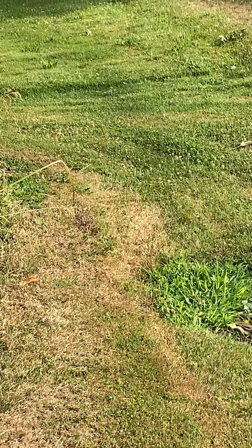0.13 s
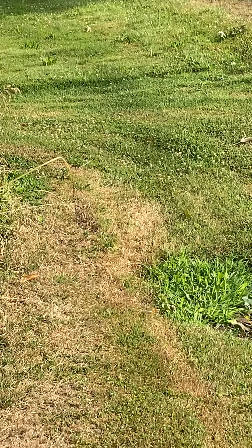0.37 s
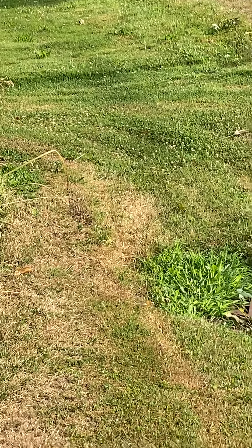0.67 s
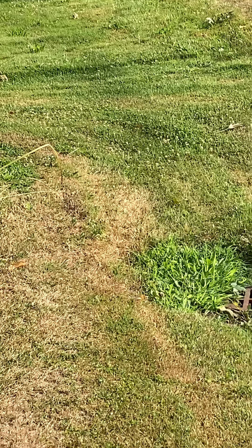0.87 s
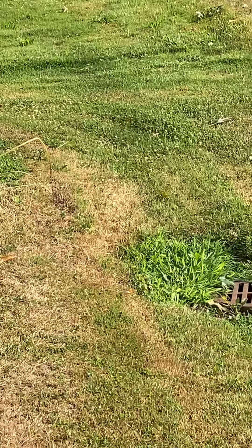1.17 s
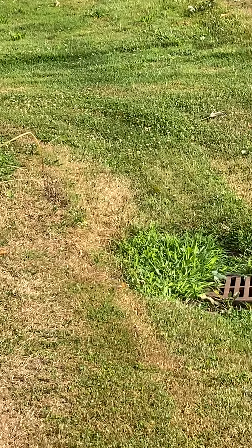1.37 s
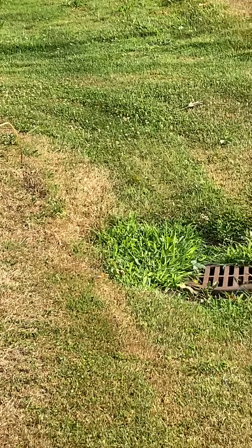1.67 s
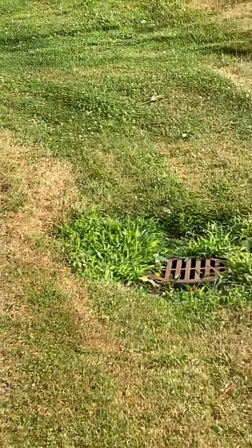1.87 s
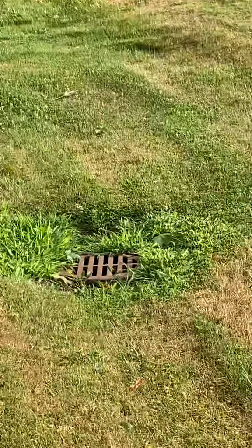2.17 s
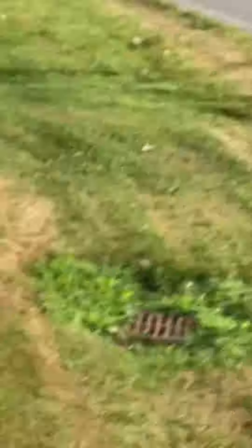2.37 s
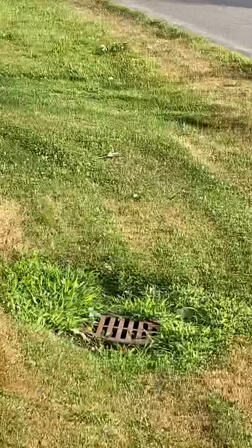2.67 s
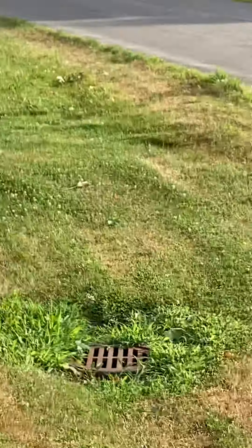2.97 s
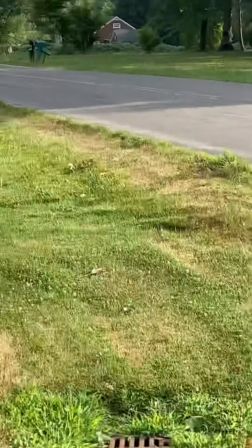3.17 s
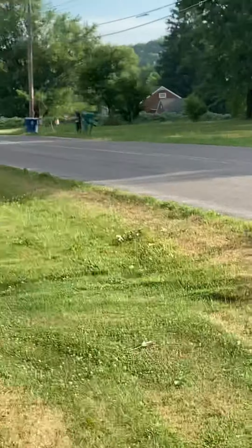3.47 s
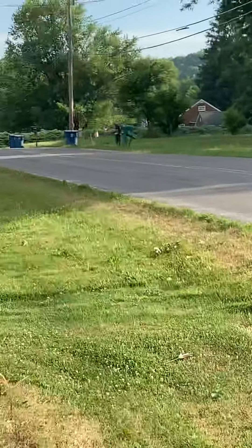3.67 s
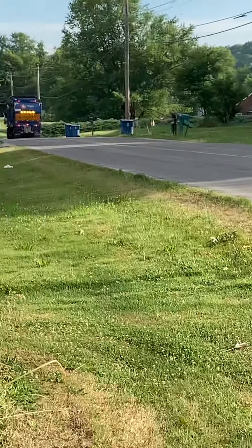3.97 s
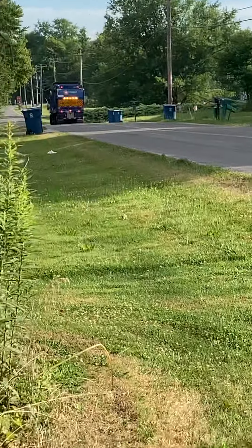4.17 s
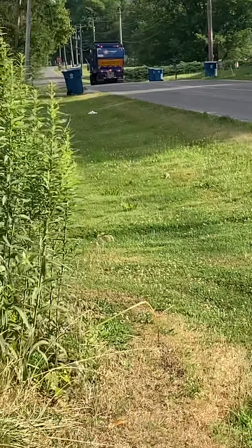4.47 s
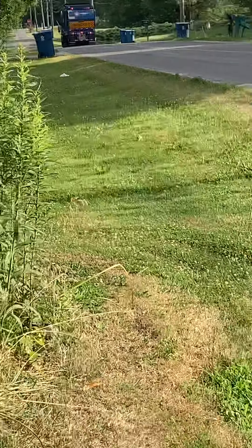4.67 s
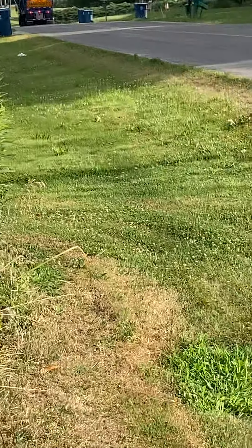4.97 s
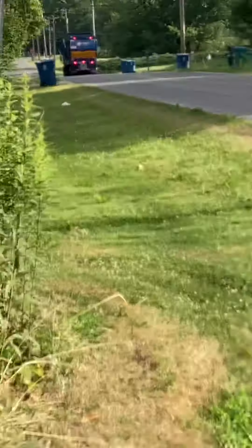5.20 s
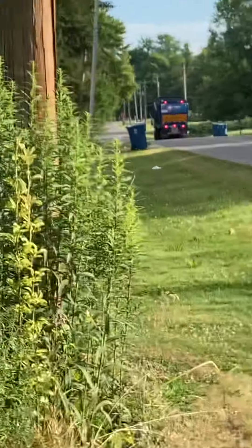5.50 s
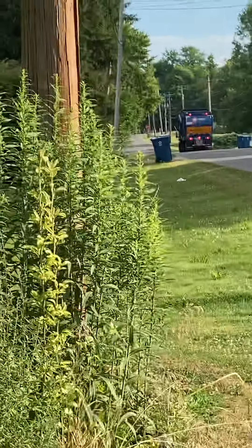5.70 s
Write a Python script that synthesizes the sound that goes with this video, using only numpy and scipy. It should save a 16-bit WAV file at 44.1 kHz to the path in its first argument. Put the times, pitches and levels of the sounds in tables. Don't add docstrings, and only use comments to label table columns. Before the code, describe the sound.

A distant diesel refuse truck hums low and steady while its brakes squeal thin and high, metal knocks, and a small bird twitters briefly.

```python
import sys
import numpy as np
from scipy import signal
from scipy.fft import rfft, irfft, next_fast_len
from scipy.io import wavfile

SR = 44100
rng = np.random.default_rng(int(sys.argv[2]) if len(sys.argv) > 2 else 0)


def generate_wav(signal):
    frames = np.transpose(np.atleast_2d(signal))
    scaled = np.clip(frames, -1, 1) * 32767
    pcm = np.round(scaled).astype(np.int16)
    wavfile.write(sys.argv[1], SR, pcm)


def voltage_ratio(decibels):
    exponent = np.asarray(decibels, float) / 20
    return 10 ** exponent


N = 257539

# [t/s, f/Hz]
FIRING_RATE = [
    (0, 78.24),
    (1.45, 79.1),
    (1.9, 77.48),
    (5.84, 76.94),
]
# [t/s, firing tone level/dB, octave level/dB]
EXHAUST_LEVELS = [(0, -41.5, -56), (.62, -40, -52), (.78, -36, -56.5), (.92, -38, -53.5), (1.4, -36, -52.5),
                  (1.8, -37, -49), (2.05, -41, -56.5), (2.5, -44, -60), (2.95, -58.5, -57),
                  (3.15, -42.5, -49), (3.8, -49, -54), (3.95, -36, -62), (4.2, -35, -50),
                  (4.32, -42, -58.5), (4.45, -34.5, -46), (4.85, -30.5, -44), (5.65, -36, -60),
                  (5.84, -40.5, -54.5)]
# [t/s, rumble level/dB, clatter level/dB]
ROAR_LEVELS = [
    (0.0, -48, -53),
    (1.15, -49, -53.5),
    (1.48, -51.5, -53.5),
    (5.84, -51, -53),
]
# [f/Hz, level per Hz/dB]
RUMBLE_COLOUR = [(15, -51.5), (25, -10.5), (40, -3), (62, 3.5), (100, 1), (140, -5.5), (200, -11),
                 (300, -21), (420, -38)]
# [f/Hz, level per Hz/dB]
CLATTER_COLOUR = [(150, -26), (260, -2), (390, -10.5), (450, -4), (690, -10.5), (1200, -5), (1700, -8.5),
                  (2890, -21), (4500, -29), (6000, -34), (9000, -49), (14000, -47.5), (15000, -76.5)]
# [f/Hz, share kept when quiet, share kept while the brakes sing]
TREBLE_KEPT = [(4900, 1, 1), (5250, .7, .3), (6500, .8, .25), (6900, 1, .75), (9400, 1, .75),
               (10000, .9, 0), (11000, .8, 0), (11400, .1, 0), (12800, .2, 0), (13200, .8, 0)]
# [t/s, length/s, f/Hz, peak level/dB]
LOW_MODES = [(.64, .21, 6060, -59), (1.06, 0.16, 6100, -65.5), (1.75, .2, 5930, -59.5),
             (1.9, 0.2, 5750, -62.5), (2.3, 0.16, 5770, -58.5), (2.33, 0.22, 5100, -48),
             (2.5, 0.38, 5060, -67.5), (2.49, 0.29, 5960, -59.5), (2.76, 0.16, 5775, -62),
             (2.82, 0.23, 5050, -63), (2.84, 0.17, 6027, -66), (3.2, 0.35, 5680, -69),
             (3.21, 0.29, 5020, -65), (3.24, 0.38, 4750, -70), (3.48, .3, 5813, -63),
             (3.65, .09, 4790, -62), (3.72, 0.26, 6130, -72.5), (3.73, 0.21, 5070, -52.5),
             (4.0, 0.46, 5790, -64.5), (3.93, .27, 4940, -62), (4.3, 0.27, 5070, -62),
             (4.46, 0.24, 4875, -56), (4.64, 0.13, 5020, -57), (4.63, .45, 4900, -67),
             (3.92, 0.43, 4150, -76), (4.55, .35, 5780, -75), (1.2, .05, 5200, -67), (1.4, .04, 5350, -66)]
# [t/s, length/s, f/Hz, peak level/dB]
MID_MODES = [(.44, 0.21, 7085, -73), (.46, 0.31, 6780, -64), (.68, 0.4, 6550, -72),
             (.78, 0.25, 7200, -67.5), (.92, 0.29, 6770, -58), (1.3, .35, 6780, -64),
             (1.5, 0.61, 7020, -55.5), (2.09, .27, 6840, -57.5), (2.27, 0.235, 7118, -64),
             (2.52, 0.32, 7090, -62), (2.95, 0.29, 7330, -58.5), (.52, 0.24, 7580, -60),
             (1.0, 0.35, 7570, -62.5), (1.79, 0.41, 7706, -58), (2.15, 0.41, 7540, -62.5),
             (2.82, 0.26, 7800, -57.5), (3.21, 0.34, 7850, -63), (3.96, 0.17, 7430, -72),
             (4.19, .3, 8010, -68), (.55, .12, 8140, -76), (.92, 0.41, 8340, -62.5), (1.55, .28, 8530, -62),
             (1.72, 0.46, 8080, -64.5), (1.86, .15, 8484, -64), (2.93, 0.16, 8465, -61),
             (3.49, 0.34, 8400, -70), (3.89, .21, 8466, -71), (4.24, 0.22, 8495, -74),
             (4.05, 0.18, 6950, -75), (4.6, 0.42, 7850, -83)]
# [t/s, length/s, f/Hz, peak level/dB]
HIGH_MODES = [(0.505, 0.13, 8871, -74.5), (.62, .58, 8610, -60), (.8, .22, 8770, -61),
              (1.251, .36, 8700, -61.5), (1.998, 0.51, 8740, -64), (2.299, .72, 8720, -58.5),
              (3.107, 0.34, 8725, -67), (4.15, 0.53, 8830, -69), (1.101, 0.34, 9240, -61),
              (1.379, 0.62, 9450, -63.5), (1.869, 0.32, 9480, -56), (2.09, 0.3, 9200, -65.5),
              (2.413, 0.36, 9530, -62.5), (2.757, 0.38, 9130, -63), (2.981, .78, 9200, -55),
              (3.149, .8, 9430, -59), (3.659, 0.67, 9210, -58), (3.784, 0.54, 9690, -65),
              (3.859, 0.73, 9520, -64), (4.169, 0.61, 9330, -58.5), (4.62, 0.33, 9560, -73),
              (1.5, 0.37, 9160, -63), (.55, 0.22, 9340, -84),
              (.74, .14, 9960, -69), (.89, .28, 10130, -72), (.63, .16, 10735, -74), (1.36, .32, 10420, -61),
             (1.63, .34, 10380, -62), (1.9, .3, 10310, -65), (2.2, .36, 10150, -63),
             (2.52, .36, 10400, -66), (2.84, .3, 10025, -61), (3.11, .55, 10085, -63),
             (3.6, .26, 10135, -69), (3.1, .33, 10620, -73), (4.17, .36, 10000, -72),
             (4.38, .27, 10970, -70), (3.0, .1, 11450, -73), (3.55, .17, 11275, -72),
             (.48, .38, 12170, -74), (2.07, .17, 12290, -75), (2.48, .3, 12250, -75), (.3, .2, 14300, -81),
             (.47, .38, 14600, -88)]
# [t/s, level/dB]
RUB_LEVELS = [
    (.35, -110),
    (.6, -80),
    (1.5, -63.5),
    (3, -62.5),
    (4.2, -88),
    (4.8, -79),
    (5.0, -110),
]
# [t/s, length/s, f/Hz, peak level/dB]
GEAR_WHINES = [(1.25, .87, 420, -55), (3.45, .75, 447, -64), (4.55, .65, 446, -62), (5.25, .5, 446, -59),
               (1.5, .4, 1331, -61), (2.4, .6, 1331, -60), (1.75, .75, 245, -59), (3.0, .2, 128, -52),
               (4.55, .65, 229, -59), (1.45, .35, 1770, -65), (3.45, .35, 252, -60)]
# [t/s, peak level/dB, ring f/Hz, t60/s]
METAL_KNOCKS = [(2.226, -54, 2000, .004), (2.226, -37.5, 3500, 0.0058), (2.225, -32, 5330, 0.0056),
                (2.262, -40, 3500, 0.0068), (2.931, -56, 3010, 0.63), (2.962, -52.5, 2920, .08),
                (4.642, -55.5, 3110, 0.18), (5.416, -44, 2970, 0.033), (5.43, -49, 3030, 0.067),
                (5.447, -51, 3000, 0.055), (5.463, -42.5, 3060, 0.049), (5.489, -48.5, 3150, 0.057)]
# [t after phrase start/s, length/s, start f/Hz, end f/Hz, level/dB]
BIRD_PHRASE = [
    (0, 0.013, 4520, 4050, -60.5),
    (0.022, 0.014, 4900, 5040, -54),
    (0.09, .024, 3800, 3640, -57),
    (.11, .017, 3400, 2700, -59),
]
# [t/s, level/dB]
PHRASE_TIMES = [
    (3.047, -0.5),
    (3.203, -0.5),
    (3.363, 0.5),
    (3.519, 0.5),
]
# [t/s, length/s, start f/Hz, end f/Hz, level/dB]
LONE_BIRD_NOTES = [
    (3.087, 0.024, 4260, 3650, -61),
    (3.732, .019, 5000, 3300, -57),
    (3.836, 0.019, 4800, 3380, -58),
    (3.88, 0.02, 3500, 2700, -61),
]
# [f/Hz, left-right likeness]
MIC_LIKENESS = [(60, 0.98), (200, 1), (500, 0.68), (1000, 0.79), (2000, 0.67), (4000, 0.11), (8000, 0.74)]
# [f/Hz, left over right level/dB]
MIC_LEFT_LEVEL = [(60, 0), (110, 3), (190, 0), (340, 3), (600, 2.5), (1060, -0.5), (1870, -2.5), (3330, -2),
                  (5910, 0), (10500, 1)]
# [f/Hz, left lead/rad]
MIC_LEFT_LEAD = [(0, .1), (340, -.18), (760, -.95), (1050, -.5), (2500, -.42), (3400, -1.9), (4000, -5.5),
                 (4700, -4.0), (5150, -3.8), (5900, -2.5), (7300, -1.2), (8450, 0), (11500, 3),
                 (12200, 3.4), (14300, 6)]


def rms_one(x):
    return x / np.sqrt(np.mean(np.abs(x) ** 2) + 1e-20)


def in_time(rows):
    s, *columns = np.transpose(rows)
    return [np.interp(np.arange(N) / SR, s, column) for column in columns]


def at_hz(points, hz):
    table = np.array(points)
    return np.interp(np.log(hz + 1), np.log(table[:, 0] + 1), table[:, 1])


def drift(rate_hz, size=N):
    r = np.exp(-2 * np.pi * rate_hz / SR)
    run_in = SR // 4
    white = rng.standard_normal(size + run_in)
    return rms_one(signal.lfilter([1], [1, -2 * r, r * r], white)[run_in:])


def flutter(width_hz, size):
    run_in = SR // 8
    white = rng.standard_normal(size + run_in) + 1j * rng.standard_normal(size + run_in)
    low_pass = signal.butter(3, width_hz, fs=SR, output="sos")
    return rms_one(signal.sosfilt(low_pass, white)[run_in:])


def noise_pair(spectrum, low_hz, octaves, patchy_db):
    out = 0
    edges = low_hz * 2 ** np.arange(0, octaves, .5)
    white = rng.standard_normal((2, 2, N))
    for k, (low, high) in enumerate(zip(edges, edges[1:])):
        band_pass = signal.butter(2, [low, high], "band", fs=SR, output="sos")
        band = signal.sosfilt(band_pass, white[k % 2])
        alike = np.clip(at_hz(MIC_LIKENESS, np.sqrt(low * high)), 0, 1)
        flicker = voltage_ratio(patchy_db * drift(8.3))
        out = out + flicker * band * np.sqrt([[1 + alike], [1 - alike]])
    hz = np.fft.rfftfreq(N, 1 / SR)
    coloured = irfft(rfft(out) * voltage_ratio(at_hz(spectrum, hz)), N)
    return rms_one(coloured) / np.sqrt(2)


def tones(rows, fade_s, steady, spread, attack_s=1, release_s=1, edge_db=0):
    out = np.zeros(N)
    for start, length, hz0, hz1, db in rows:
        end = start + length
        first = max(int((start - fade_s) * SR), 0)
        last = min(int((end + fade_s) * SR), N)
        t = np.arange(first, last) / SR
        to_edge = np.minimum(t - start, end - t)
        swell = np.sin(np.pi / 2 * np.clip(to_edge / (2 * fade_s) + .5, 0, 1))
        squeeze = min(1, length / (attack_s + release_s))
        growth = np.minimum((t - start) / attack_s, (end - t) / release_s)
        below = np.clip(1 - growth / squeeze, 0, 1)
        waver = steady + flutter(spread * hz0, size=len(t))
        phase = 2 * np.pi * np.cumsum(hz0 + (hz1 - hz0) * (t - start) / length) / SR
        level = voltage_ratio(db - edge_db * below) * swell * np.sqrt(2 / (1 + steady ** 2))
        out[first:last] += level * np.real(waver * np.exp(1j * phase))
    return out


def held(rows):
    return [(s, length, hz, hz, db) for s, length, hz, db in rows]


def creeping(rows, stopping_per_s):
    creep, creep_fade_s, stopping_s = .016, 2.1, 4.3
    out = []
    for s, length, hz, db in rows:
        rise = creep * np.exp(-s / creep_fade_s)
        rise += stopping_per_s * max(s + length - stopping_s, 0)
        out.append((s, length, hz * (1 - rise / 2), hz * (1 + rise / 2), db))
    return out


def exhaust():
    phase = 2 * np.pi * np.cumsum(in_time(FIRING_RATE)[0]) / SR + 0.097 * drift(6.6)
    first_db, octave_db = in_time(EXHAUST_LEVELS)
    first = voltage_ratio(first_db + 0.46 * drift(8.4)) * np.cos(phase)
    octave = voltage_ratio(octave_db + 1.8 * drift(27.0)) * np.cos(2 * phase + 0.92)
    return np.sqrt(2) * (first + octave)


def rumble():
    level_db = in_time(ROAR_LEVELS)[0]
    return voltage_ratio(level_db + 5.5) * noise_pair(RUMBLE_COLOUR, 14.92, 5.6, patchy_db=0.83)


def clatter():
    level_db = in_time(ROAR_LEVELS)[1]
    return voltage_ratio(level_db + 2.5) * noise_pair(CLATTER_COLOUR, 158.4, 6.6, patchy_db=1.28)


def hushed(x):
    hz, t, cells = signal.stft(x, SR, nperseg=1024)
    table_hz, *shares = np.transpose(TREBLE_KEPT)
    braking = np.interp(t, [.3, .55, 4.75, 4.9], [0, 1, 1, 0])
    quiet, covered = (np.interp(hz, table_hz, share)[:, None] for share in shares)
    dice = rng.random((len(hz) // 8 + 1, len(t) // 4 + 1))
    dice = dice.repeat(8, axis=0).repeat(4, axis=1)[:len(hz), :len(t)]
    kept = dice < quiet + (covered - quiet) * braking
    return signal.istft(cells * kept, SR, nperseg=1024)[1][:, :N]


def brakes():
    low = tones(held(LOW_MODES), fade_s=.015, steady=1.4, spread=.01,
                attack_s=0.14, release_s=0.29, edge_db=10.5)
    rows = creeping(MID_MODES, 0) + creeping(HIGH_MODES, stopping_per_s=0.025)
    high = tones(rows, fade_s=.03, steady=.9, spread=.011,
                 attack_s=0.12, release_s=0.18, edge_db=10.5)
    return voltage_ratio(3.5) * low + voltage_ratio(0.55) * high


def rub():
    band_pass = signal.butter(6, [6600, 10200], "band", fs=SR, output="sos")
    hiss = signal.sosfilt(band_pass, rng.standard_normal(N))
    return voltage_ratio(in_time(RUB_LEVELS)[0]) * rms_one(hiss)


def whines():
    return tones(held(GEAR_WHINES), fade_s=0.11, steady=5, spread=0.0088, edge_db=7.5)


def knocks():
    out = np.zeros(N)
    t = np.arange(SR // 8) / SR
    onset = 1 - np.exp(-t / 0.00033)
    for s, db, hz, t60 in METAL_KNOCKS:
        rough_phase = 2 * np.pi * hz * t + 1.07 * drift(250.0, size=len(t))
        ring = np.sin(rough_phase) * voltage_ratio(db - 60 * t / t60)
        first = int(s * SR)
        out[first:first + len(t)] += ring * onset
    return out


def bird():
    sung = [(s + after, length, hz0, hz1, db + gain_db)
            for s, gain_db in PHRASE_TIMES
            for after, length, hz0, hz1, db in BIRD_PHRASE]
    notes = sung[2:] + LONE_BIRD_NOTES
    buzzes = [row for row in notes if row[1] > .021]
    whistles = [row for row in notes if row[1] <= .021]
    clean = tones(whistles, fade_s=.004, steady=2.5, spread=.03)
    return clean + tones(buzzes, fade_s=.006, steady=.3, spread=.07)


def scene():
    treble = clatter() + rub() * [[1], [0]]
    roar = rumble() + hushed(treble)
    common = roar[0] + exhaust() + brakes() + whines() + knocks() + bird()
    return np.array([common + roar[1], common - roar[1]])


def top_cut(x):
    return signal.sosfilt(signal.butter(12, 15000, fs=SR, output="sos"), x)


def record(dry):
    edge = SR // 20
    padded = np.pad(dry, ((0, 0), (edge, edge)), "reflect")
    size = next_fast_len(N + 4 * edge)
    hz = np.fft.rfftfreq(size, 1 / SR)
    lead = np.interp(hz, *np.transpose(MIC_LEFT_LEAD))
    half = voltage_ratio(at_hz(MIC_LEFT_LEVEL, hz) / 2) * np.exp(.5j * lead)
    ports = irfft(rfft(padded, size) * [half, 1 / half], size)[:, edge:edge + N]
    return top_cut(ports)


dry = scene()
out = record(dry)
generate_wav(out)
```